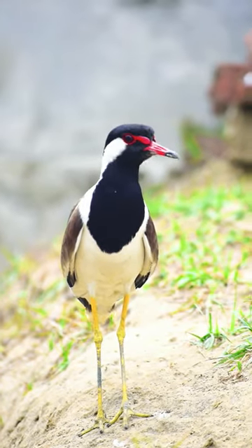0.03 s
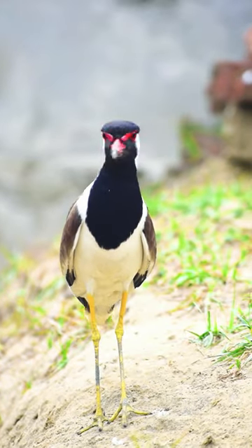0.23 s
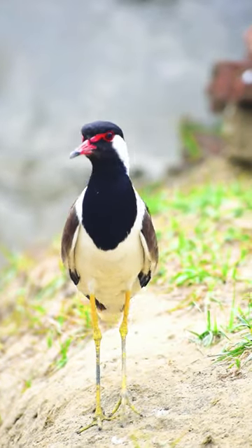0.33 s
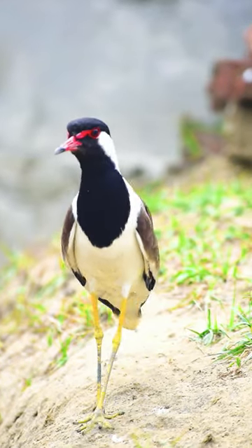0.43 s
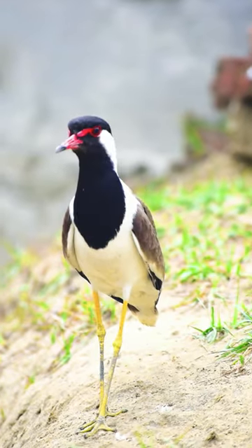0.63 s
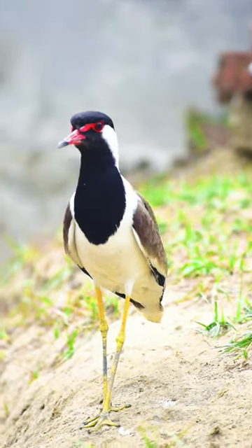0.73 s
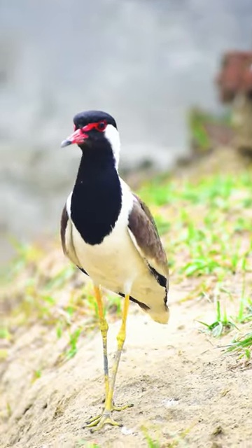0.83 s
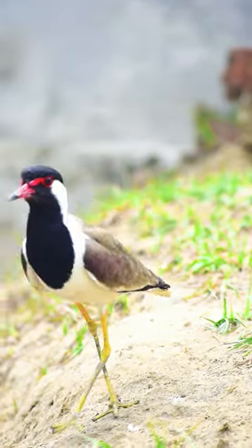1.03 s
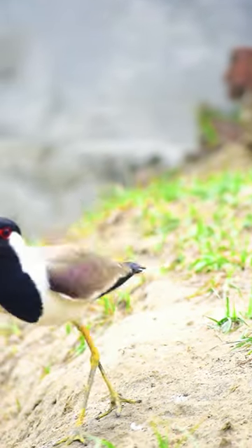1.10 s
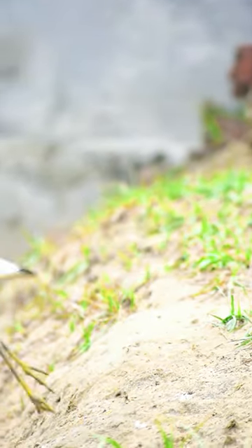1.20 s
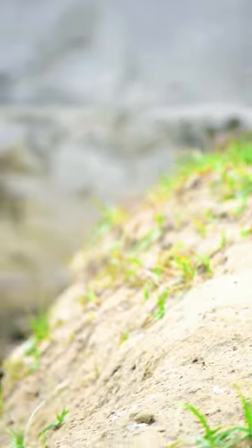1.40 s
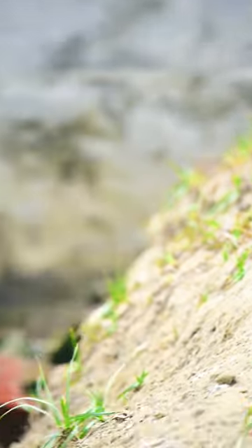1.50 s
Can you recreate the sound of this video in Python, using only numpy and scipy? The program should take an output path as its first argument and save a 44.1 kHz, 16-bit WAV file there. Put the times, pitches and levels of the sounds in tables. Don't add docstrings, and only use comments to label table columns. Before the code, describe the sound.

Lapwing alarm calls: one loud sharp level note, then three shorter, quieter falling notes outdoors

```python
import sys
import numpy as np
from scipy import signal
from scipy.fft import rfft, irfft, next_fast_len
from scipy.io import wavfile
from scipy.ndimage import uniform_filter1d

SR = 44100
rng = np.random.default_rng(int(sys.argv[2]) if len(sys.argv) > 2 else 0)


def how_loud(loudness_db):
    steps = np.asarray(loudness_db, float) / 20
    return 10 ** steps


def wrap_up_sound(samples):
    columns = np.atleast_2d(samples).T
    tamed = np.clip(columns, -1, 1)
    steps = np.round(tamed * 32767).astype(np.int16)
    wavfile.write(sys.argv[1], SR, steps)


N = 68355


def standing_note(t):
    # time_s, pitch_hz, swell_db
    contour = [
        (.2226, 1328, -3),
        (.229, 1334, 0),
        (.238, 1342, -.5),
        (.244, 1366, 0),
        (.250, 1350, 0),
        (.2605, 1352, 1.5),
    ]
    # multiple, level_db
    orders = [(1, -17), (2, -3.5), (3, 0), (4, -10), (5, -7.5), (6, -14), (7, -19), (8, -20), (9, -24),
              (10, -30), (11, -32)]
    time_s, pitch_hz, swell_db = np.array(contour).T
    voice = stack(np.interp(t, time_s, pitch_hz), np.array(orders)[:, 1], spread_rad=.12)
    gain = how_loud(np.interp(t, time_s, swell_db) - 27)
    return voice * gain * gate(t, time_s[0], time_s[-1] - time_s[0])


def flight_notes(t):
    # start_s, length_s, pitch_hz, level_db, hold_s
    notes_in_flight = [
        (0.7867, .051, 1341, -37.5, .012),
        (1.1199, .051, 1368, -37.5, .011),
        (1.5432, .051, 1372, -41.5, .012),
    ]
    # freq_hz, level_db
    throat_curve = [(1000, -10), (1350, -13.5), (2100, -0.5), (2700, -1.5), (3500, -1), (4100, -5),
                    (5400, -12), (6800, -20.5)]
    fall_hz, fall_power, fade_db = 324, 1.8, -14.5
    slope_db_per_khz, darken_db = -2.7, -11

    pitch_hz, gain, slack = np.full(N, 1.), np.zeros(N), np.zeros(N)
    for start_s, length_s, note_hz, note_db, hold_s in notes_in_flight:
        sag = np.clip((t - start_s - hold_s) / (length_s - hold_s), 0, 1) ** fall_power
        on = gate(t, start_s, length_s)
        pitch_hz = np.where(on > 0, note_hz - fall_hz * sag, pitch_hz)
        gain = gain + on * how_loud(note_db + fade_db * sag ** 1.33)
        slack = slack + (on > 0) * sag

    top_hz = throat_curve[-1][0]
    order_db = []
    for k in range(1, 12):
        f = k * pitch_hz
        throat_db = on_log(f, throat_curve) + slope_db_per_khz * np.maximum(f - top_hz, 0) / 1000
        order_db.append(throat_db + darken_db * max(k - 3, 0) * slack)
    return gain * stack(pitch_hz, order_db, spread_rad=.1)


def stack(pitch_hz, order_db, spread_rad):
    wobble_db, wobble_rate_hz, breath_db, breath_top_hz = 1.5, 260, -30.5, 5000
    unsteady = 1 + .004 * walk(500) + .005 * walk(2500)
    phase = 2 * np.pi * np.cumsum(pitch_hz * unsteady) / SR
    tone = 0
    for k, db in enumerate(order_db, 1):
        waver_db = wobble_db * np.sqrt(k - .8) * walk(wobble_rate_hz)
        tone = tone + how_loud(db + waver_db) * np.cos(k * phase - spread_rad * k * k)
    hiss = signal.lfilter(*signal.butter(2, breath_top_hz, fs=SR), rng.standard_normal(N))
    breath = hiss * (1 + np.cos(phase))
    return np.sqrt(2) * (tone + how_loud(breath_db) * breath)


def gate(t, start_s, length_s):
    attack_s, release_s = .0012, .004
    opening = np.clip((t - start_s) / attack_s, 0, 1)
    closing = np.clip((start_s + length_s - t) / release_s, 0, 1)
    return opening * closing


def beak(t):
    # start_s, level_db, ring_hz
    ticks = [
        (.2095, -51, 3200),
        (.211, -52, 2200),
        (.2128, -52, 5000),
    ]
    decay_s = 0.00075
    out = 0
    for start_s, tick_db, ring_hz in ticks:
        age_s = np.maximum(t - start_s, 0)
        out = out + how_loud(tick_db) * 2 * np.exp(-age_s / decay_s) * np.sin(2 * np.pi * ring_hz * age_s)
    return out


def from_bank(voice):
    # delay_s, level_db, smear_s, top_hz
    echoes = [
        (.0066, -16.5, .001, 14000),
        (0.0099, -12.5, 0.0011, 14000),
        (0.0367, -21.5, .001, 12100),
        (.060, -29, 0.0027, 8900),
        (0.0787, -27.5, 0.0017, 9000),
        (.108, -27.5, .003, 8900),
        (.141, -29.5, 0.0024, 8800),
        (0.297, -25.5, 0.0028, 3160),
        (0.329, -38, 0.0027, 3200),
    ]
    return space(voice, echoes, pan_db=-2, tail_db=-17.5, near_db=15.5, turned_db_per_khz=0)


def from_flight(voice):
    # delay_s, level_db, smear_s, top_hz
    echoes = [
        (0.0082, -18, 0.0011, 12000),
        (0.026, -21, 0.0028, 12000),
        (0.0313, -8.5, .0006, 9000),
        (.096, -31, .002, 9000),
        (.162, -26.5, .002, 9020),
        (.215, -25.5, .001, 3036),
    ]
    return space(voice, echoes, pan_db=-.2, tail_db=-11.5, near_db=2.5, turned_db_per_khz=-.8)


def space(voice, echoes, pan_db, tail_db, near_db, turned_db_per_khz):
    # freq_hz, t60_s
    tail_t60 = [(1300, 0.7), (2700, 0.9), (4000, 0.81), (6800, 0.87), (10000, 0.66), (15000, 0.17)]
    scatter, tail_side, tail_rise_s, near_t60_s = .35, .5, 0.0041, 0.19
    echo_low_hz, port_lag_s = 1670, 1.2e-5
    size = next_fast_len(2 * N)
    hz, t = np.fft.rfftfreq(size, 1 / SR), np.arange(N) / SR
    lr = np.array([[.5], [-.5]])

    def pair():
        mid = rng.standard_normal(N)
        return mid + tail_side * 2 * lr * np.diff(rng.standard_normal(N + 1))

    out = np.ones((2, 1)) * how_loud(turned_db_per_khz * hz / 1000)
    for delay_s, echo_db, smear_s, top_hz in echoes:
        burst = scatter * unit(pair() * np.exp(-t / smear_s)) / np.sqrt(N) + (t == 0)
        high_cut = 1 / (1 + (hz / top_hz) ** 6)
        low_cut = 1 / (1 + (echo_low_hz / np.maximum(hz, 1)) ** 4)
        lag = np.exp(-2j * np.pi * hz * delay_s)
        out = out + how_loud(echo_db) * high_cut * low_cut * rfft(burst, size) * lag
    out = out * how_loud(pan_db * lr) * np.exp(2j * np.pi * hz * port_lag_s * lr)

    tail, hiss = 0, pair() * (1 - np.exp(-t / tail_rise_s))
    for centre_hz in 500 * 2. ** np.arange(7):
        share = np.clip(1 - np.abs(np.log2(np.maximum(hz, 500) / centre_hz)), 0, 1)
        fade = how_loud(-60 * t / on_log(centre_hz, tail_t60)) + how_loud(near_db - 60 * t / near_t60_s)
        tail = tail + share * rfft(hiss * fade, size)
    out = out + how_loud(tail_db) * tail / np.sqrt(SR / 10)
    return irfft(out * rfft(voice, size), size)[:, :N]


def air():
    # freq_hz, density_db
    traffic = [(20, -9), (60, -7.5), (300, -12.5), (480, -12), (720, -5.5), (1300, -5.5), (6000, -22.5),
               (15500, -43)]
    # freq_hz, side_db
    side_curve = [(60, -8), (110, -21.5), (200, -18), (380, -25.5), (700, -23.5), (1290, -13.5),
                  (2380, -10.5), (4400, -10), (8120, -12), (15000, 6)]
    # centre_hz, width_hz, level_db
    bands = [
        (105, 5.3, -84),
        (122.2, 14.3, -74.5),
        (160, 12, -85),
        (193.5, 29, -84.5),
        (8090, 580, -79.5),
        (14600, 2500, -92.5),
    ]
    traffic_db, flicker_db, drone_fade_db_per_s = -63, -1.06, -3.5
    hz, t = np.fft.rfftfreq(N, 1 / SR), np.arange(N) / SR
    side = how_loud(on_log(hz, side_curve)) * np.array([[1], [-1]])

    def noise(shape):
        mid = rfft(rng.standard_normal(N))
        return irfft(shape * (mid + side * rfft(rng.standard_normal(N))), N)

    wide = 0
    for centre_hz in 20 * 2 ** np.arange(0, 10, .5):
        share = np.cos(np.pi * np.clip(np.log2(np.maximum(hz, 1) / centre_hz), -.5, .5))
        wide = wide + noise(share * how_loud(on_log(hz, traffic))) * how_loud(flicker_db * walk(6.63))
    out = how_loud(traffic_db) * unit(wide)
    for centre_hz, width_hz, band_db in bands:
        fade_db = (centre_hz < 150) * drone_fade_db_per_s * t
        resonance = 1 / (1 + ((hz - centre_hz) / width_hz * 2) ** 2)
        out = out + how_loud(band_db + 1.3 * walk(4) + fade_db) * unit(noise(resonance))
    return out


def unit(x):
    return x / np.sqrt(np.mean(x ** 2))


def walk(rate_hz):
    k = int(SR / rate_hz)
    held = np.repeat(rng.standard_normal(N // k + 1), k)
    return 1.3 * uniform_filter1d(uniform_filter1d(held, k), k)[:N]


def on_log(hz, table):
    table = np.array(table)
    return np.interp(np.log(np.maximum(hz, 1)), np.log(table[:, 0]), table[:, 1])


def scene():
    t = np.arange(N) / SR
    return from_bank(standing_note(t) + beak(t)) + from_flight(flight_notes(t)) + air()


def roll_off(x):
    return signal.sosfilt(signal.butter(12, 15830, fs=SR, output="sos"), x)


def record(dry):
    top_cut = signal.ellip(8, .2, 60, 15700, fs=SR, output="sos")
    mix = signal.sosfilt(top_cut, dry) - .0008
    return roll_off(mix)


dry = scene()
out = record(dry)
wrap_up_sound(out)
```